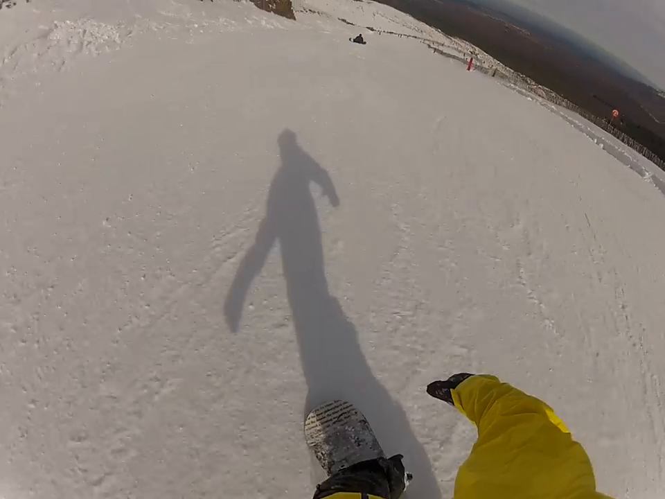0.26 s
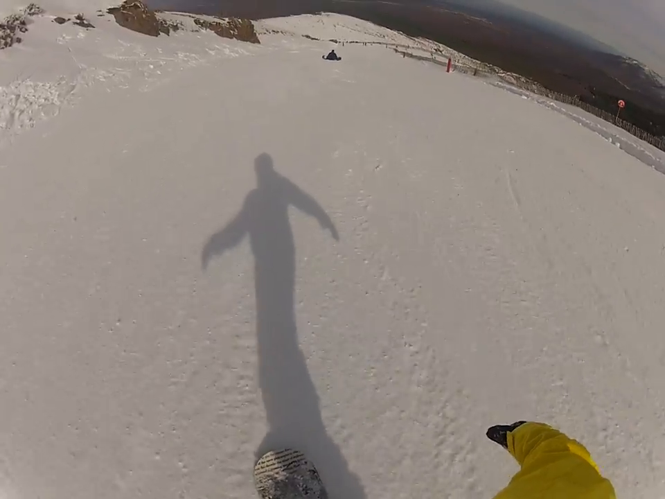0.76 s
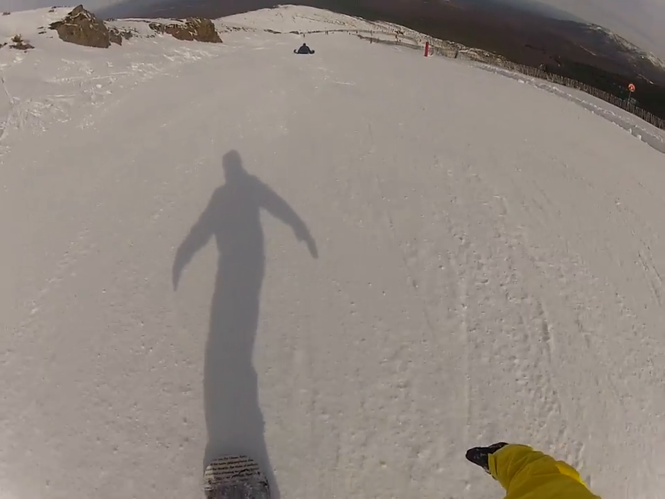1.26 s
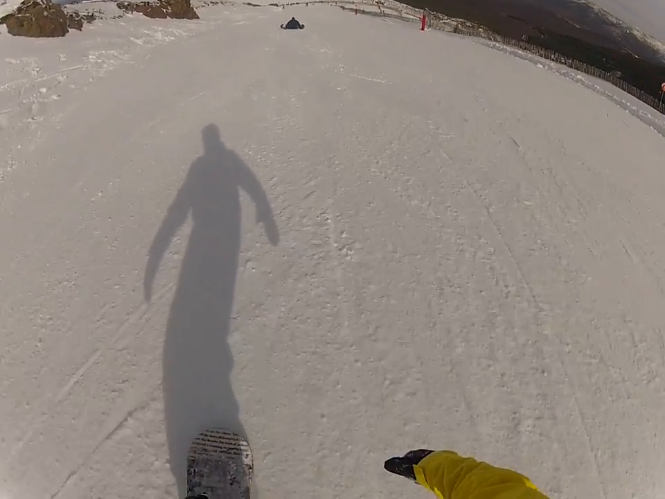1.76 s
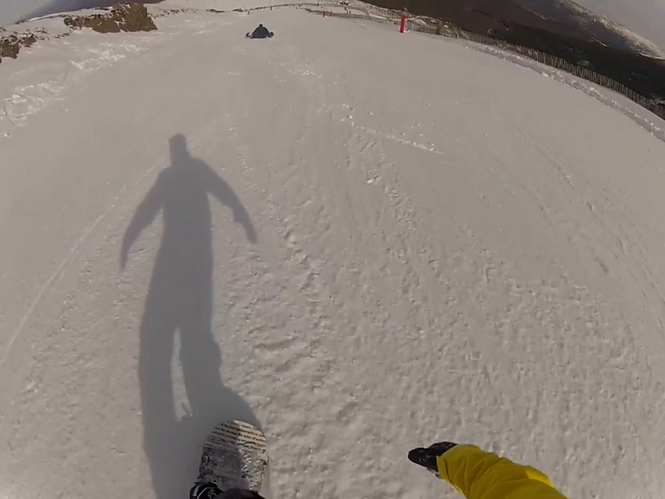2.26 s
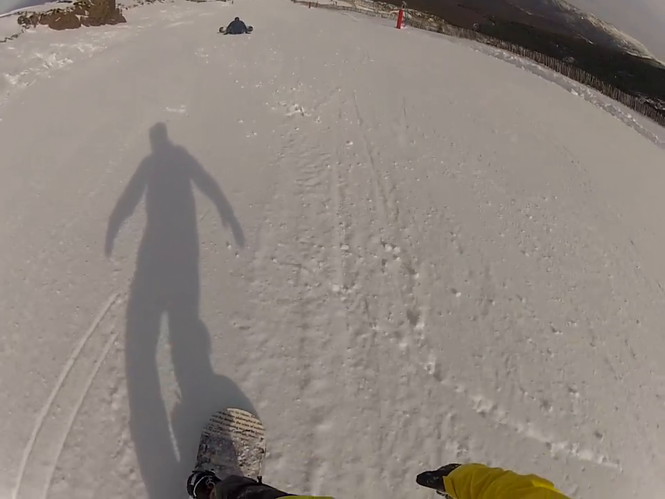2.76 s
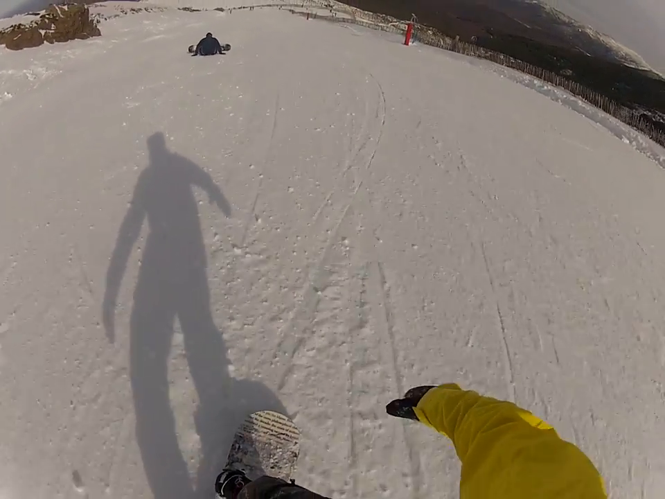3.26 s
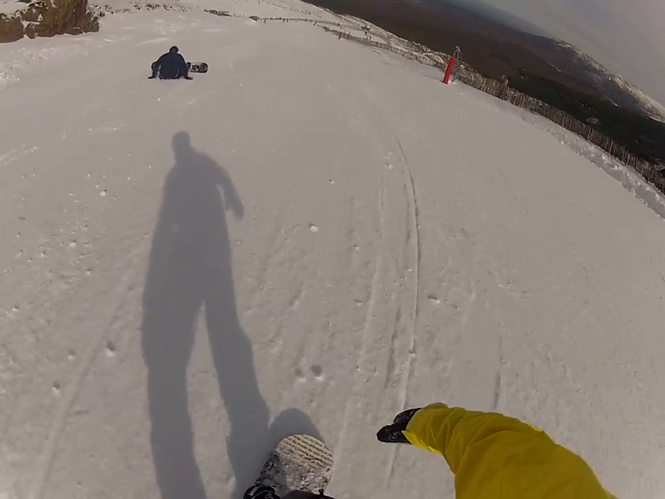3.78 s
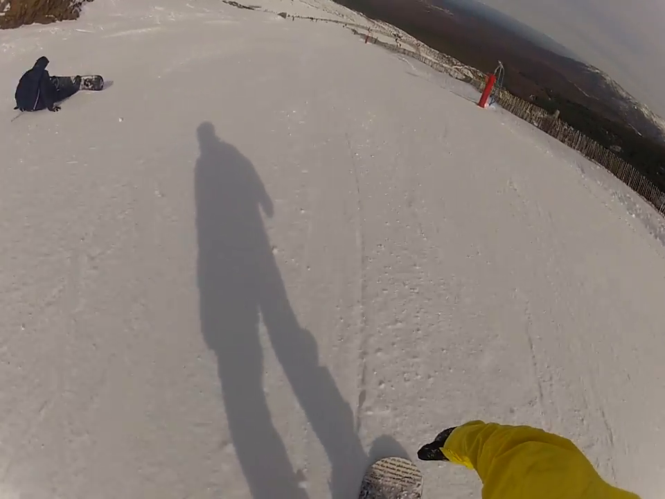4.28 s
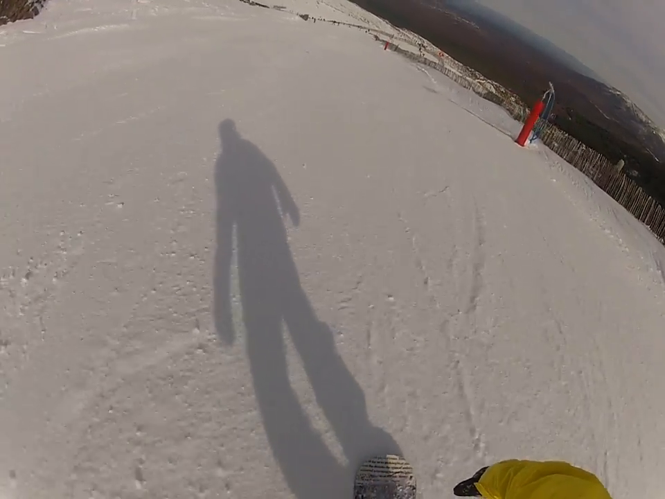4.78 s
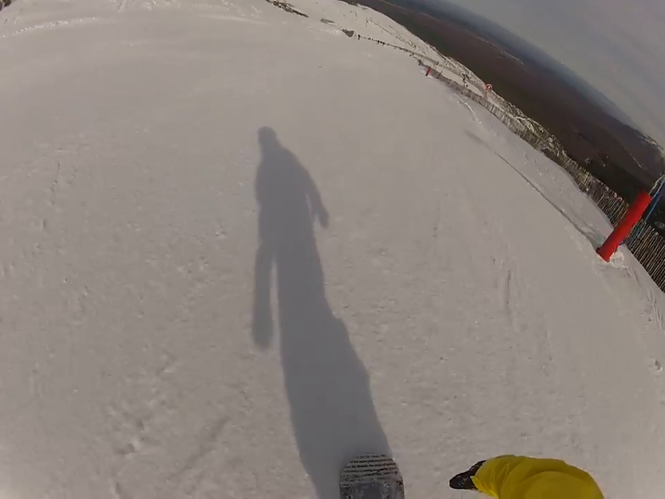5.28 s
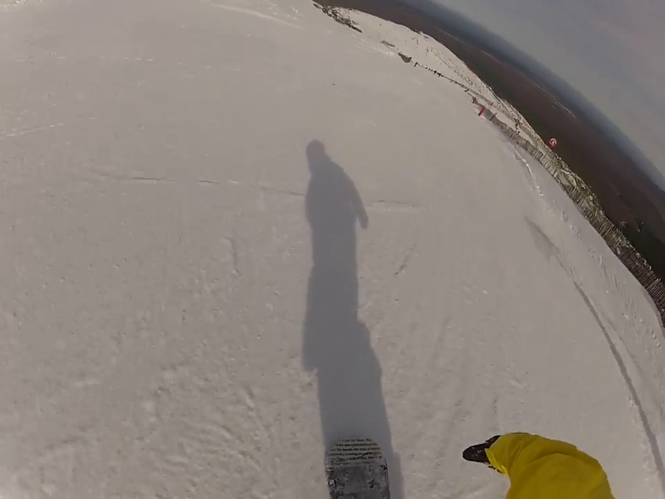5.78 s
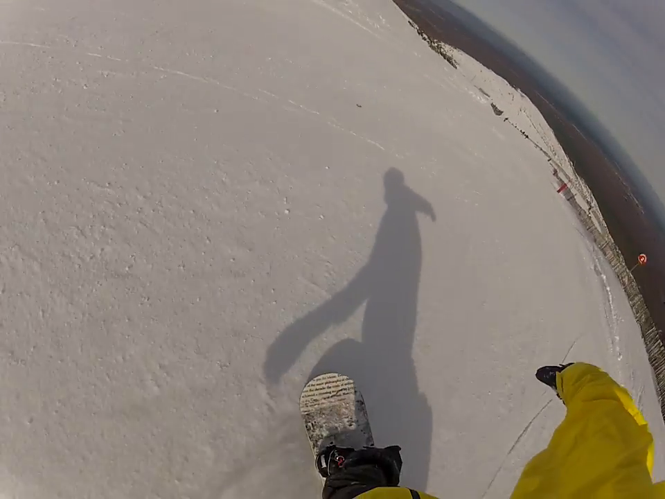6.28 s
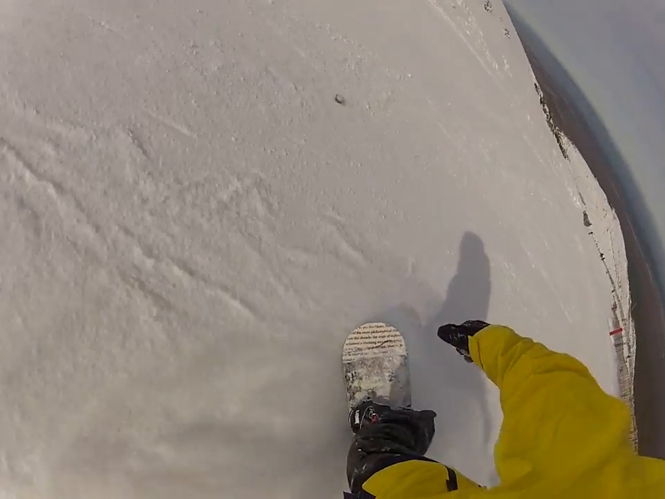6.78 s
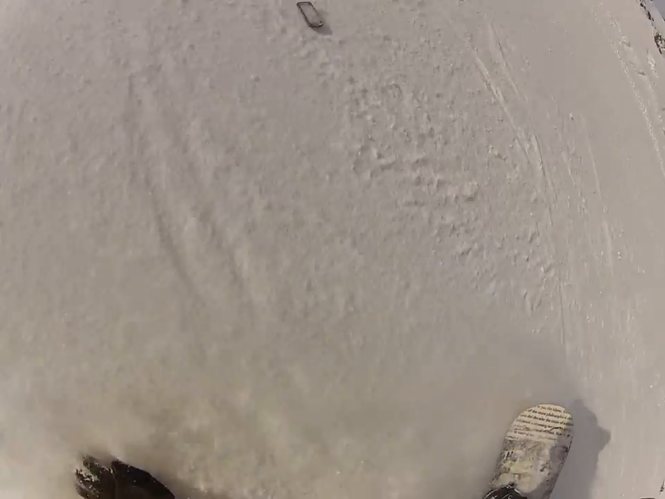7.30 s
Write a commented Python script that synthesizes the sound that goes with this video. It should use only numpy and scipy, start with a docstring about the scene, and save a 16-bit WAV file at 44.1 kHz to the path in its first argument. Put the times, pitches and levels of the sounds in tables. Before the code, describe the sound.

A snowboard hisses and crunches over packed snow with low rumble, dull bumps and buffeting wind, then scrapes harder into a skidding stop.

```python
"""A hiss and crunch of packed snow under a snowboard, with rumble, dull thuds and buffeting wind.
Friction is grainy noise ringing through the resonances of the board; ripples make low surging noise.
Bumps excite the damped modes of a camera mount, and gusts buffet the camera case worn by the rider.
At the end the rider leans on the heel edge and skids to a stop: scrape and spray grow, lumps crack."""
import sys
import numpy as np
from scipy import signal
from scipy.fft import rfft, irfft, next_fast_len
from scipy.io import wavfile
from scipy.ndimage import map_coordinates

SR = 44100
rng = np.random.default_rng(int(sys.argv[2]) if len(sys.argv) > 2 else 0)


def generate_wav(sig):
    """Save sig (samples, or channels by samples) to the path in sys.argv[1] as 16-bit PCM at SR."""
    pcm = np.round(np.clip(np.atleast_2d(sig).T, -1, 1) * 32767).astype(np.int16)
    wavfile.write(sys.argv[1], SR, pcm)


N = 332514

# hard bumps that knock the mount and load the board; stiffness 1 is firm, less is softer and lower:
# start_s, relative_level_db, stiffness
HARD_BUMPS = [(0.8209, -21.5, 1.01), (1.056, -25, 0.98), (1.154, -27.5, 1.05), (1.193, -27.5, 0.94),
              (1.237, -21.5, 0.52), (1.262, -18.5, 0.66), (1.306, -23.5, 0.51), (1.338, -25.5, .4),
              (1.434, -26, 1.03), (1.486, -20, 0.55), (1.517, -20, 1), (2.4067, -15.5, 0.95),
              (2.546, -21, 0.62), (2.59, -19.5, 0.9), (2.724, -19.5, 0.87), (2.969, -22, 1.16),
              (3.412, -25, 0.76), (3.9009, -17, 1.05), (4.114, -26.5, 0.84), (5.043, -24.5, 0.71),
              (5.2, -24.5, 0.77), (5.518, -19.5, 0.6), (5.68, -19.5, 0.61), (5.815, -12, 0.9),
              (6.3613, -12, 1.04), (7.2656, -15.5, 1), (7.289, -22, 0.89), (7.336, -21, 0.96),
              (7.358, -16.5, 0.82), (7.365, -18.5, 0.76), (7.411, -19.5, 0.98)]
# which edge bites, limited to -1 toe, 0 flat, 1 heel where it is read: time_s, edge
EDGE_TILT = [(0, 0.8), (.4, 0.36), (.8, 0.53), (1.2, -1.6), (1.5, -1.6), (2.8, -0.96), (3.4, -0.82),
             (3.75, -0.21), (4.05, -0.0056), (4.5, 0.13), (5, 0.08), (5.6, 0.17), (6.4, 0.22), (6.52, 0.89),
             (7.1, 0.72), (7.54, 1)]
# references for an easy glide: edge pressure and airflow, both as relative levels
CRUISE_DB, CRUISE_AIR_DB = -51.5, -38


def amp(db):
    """Logarithmic level: 20 dB is a tenfold gain in amplitude."""
    return 10 ** (np.asarray(db) / 20)


def unit(x):
    """Normalization: equal mean power, here an rms of 1."""
    return x / np.sqrt(np.mean(x ** 2) + 1e-20)


def along(points, hz):
    """Interpolation of (frequency, value) points on a logarithmic frequency axis."""
    f, v = np.transpose(points)
    return np.interp(np.log(hz + 1), np.log(f + 1), v)


def curves(rows):
    """Linear interpolation in time: one value per sample for each column after the time."""
    s, *cols = np.transpose(rows)
    return [np.interp(np.arange(N) / SR, s, c) for c in cols]


def wobble(rate):
    """Slow random modulation: a smooth curve through random knots, rate of them a second."""
    knots = rng.standard_normal(int(N * rate / SR) + 4)
    return map_coordinates(knots, [np.arange(N) * rate / SR])


def swell(middle, length):
    """Raised-cosine envelope: a smooth rise from 0 to 1 and back within the length."""
    phase = np.clip((np.arange(N) / SR - middle) / length, -.5, .5)
    return np.cos(np.pi * phase) ** 2


def filtered(x, response):
    """Linear filtering: the spectrum is multiplied by a response of frequency."""
    m = next_fast_len(len(x) + 8192)  # zero padding
    return irfft(rfft(x, m) * response(np.fft.rfftfreq(m, 1 / SR)), m)[:len(x)]


def noise(spectrum):
    """Spectral shaping: white noise takes on a given spectrum at rms 1."""
    return unit(filtered(rng.standard_normal(N), lambda hz: amp(along(spectrum, hz))))


def resonate(x, hz, q):
    """Damped resonance: a peak filter of quality factor q."""
    return signal.lfilter(*signal.iirpeak(hz, q, SR), x)


def add(track, s, sound):
    """Superposition: a sound is mixed into the track at time s."""
    part = track[round(s * SR):][:len(sound)]
    part += sound[:len(part)]


def wind(air_db):
    """Turbulence: airflow makes low noise at the camera case, modulated by gusts and small eddies."""
    # spectrum of the buffeting: frequency_hz, relative_level_db
    buffet_spectrum = [(10, -43), (25, 2), (45, 1), (68, 0), (90, -10.5), (130, -19), (250, -33),
                       (600, -31), (2000, -110)]
    # the strongest gusts: middle_s, extra_level_db
    strong_gusts = [(.83, 2), (1.27, 3.5), (1.72, 4), (2.08, 3.5), (2.19, 6.5), (2.43, 6.5), (3.46, 3),
                    (3.72, 4), (4.18, 4), (4.65, 9.5), (4.93, 5), (5.23, 2), (5.56, 7), (5.7, 7.5),
                    (5.83, 7), (6.35, 4), (7.38, 11)]
    gust_s, eddy_db, eddies_per_s = .14, 2.5, 12  # gust length; eddy depth per unit wobble; eddy pace
    gust_db = sum(db * swell(s, gust_s) for s, db in strong_gusts)
    rush = noise(buffet_spectrum)
    eddies = amp(eddy_db * np.clip(wobble(eddies_per_s), -2, 1))
    return amp(air_db + gust_db + 0.9) * unit(rush * eddies)


def board(pressure_db, air_db):
    """Forced vibration: ripples drive the board in irregular surges that grow with load and airflow."""
    # spectrum of the rumble: frequency_hz, relative_level_db
    rumble_spectrum = [(40, -14), (90, -5), (125, 0), (170, -2.5), (220, -3), (320, -5.5), (420, -25),
                       (700, -47), (3000, -79)]
    rumble_db = -44.5  # at an easy glide, on a flat board
    per_pressure_db, per_air_db = 0.72, 0.31  # dB per dB
    heel_quiet_db = 3.5  # tilted on its heel edge the board meets fewer ripples
    heel = np.clip(curves(EDGE_TILT)[0], 0, 1)
    load_db = per_pressure_db * (pressure_db - CRUISE_DB)
    speed_db = per_air_db * (air_db - CRUISE_AIR_DB)
    level_db = rumble_db + load_db + speed_db - heel_quiet_db * heel
    rumble = noise(rumble_spectrum)
    surges = amp(1.8 * wobble(45) + 2.3 * wobble(9))
    return amp(level_db) * unit(rumble * surges)


def jarring():
    """Transient loading: each hard bump loads the board quickly, then relaxes; overlaps saturate at 1."""
    peak_s = 0.013  # from impact to greatest load
    ages = (np.clip((np.arange(N) / SR - s) / peak_s, 0, 20) for s, db, stiffness in HARD_BUMPS)
    return np.tanh(sum(age * np.exp(1 - age) for age in ages))


def bumps(air_db):
    """Modal impact: a jolt makes the mount's damped modes thud; small random jolts follow the airflow."""
    # modes of the mount at stiffness 1: frequency_hz, relative_level_db, t60_s
    mount_modes = [(69, 2.5, 0.045), (166, 6, 0.032), (298, -24, 0.0078)]
    jolts_per_s, jolt_db, jolt_spread_db = 3, 2.5, 1  # rate; mean level over the airflow; scatter
    track, t = np.zeros(N), np.arange(SR // 8) / SR
    jolts = []
    for i in np.flatnonzero(rng.random(N) < jolts_per_s / SR):
        level_db = air_db[i] + jolt_db + jolt_spread_db * rng.uniform(-1, 1)
        jolts.append((i / SR, level_db, rng.uniform(0.56, 1.05)))
    for s, db, stiffness in HARD_BUMPS + jolts:
        age = t * stiffness  # a soft bump swings more slowly and for longer
        thud = np.zeros(len(t))
        for k, (hz, level, t60) in enumerate(mount_modes):
            sign = (-1) ** (k + 1)  # neighbouring modes start in opposite phase
            thud += sign * amp(level - 60 * age / t60) * np.sin(2 * np.pi * hz * age)
        thud = thud * (1 - np.exp(-t / 0.003))  # soft onset
        add(track, s, amp(db - 1.0) * thud / np.abs(thud).max())
    return track


def lumps():
    """Impact noise: lumps of snow and ice burst through two broad resonances, dull if soft, bright if icy."""
    # lumps under the board: start_s, relative_level_db, pitch_hz, burst_t60_s
    snow_lumps = [(.822, -36, 1100, .016), (3.327, -37, 1200, 0.051), (3.338, -39, 3300, 0.035),
                  (3.533, -32.5, 890, 0.034), (3.901, -30, 1100, 0.018), (3.921, -35.5, 2300, 0.028),
                  (5.428, -26, 1680, 0.035), (5.513, -30, 1630, .03), (7.127, -19.5, 1310, 0.027),
                  (7.265, -11.5, 970, 0.02), (7.267, -18, 1890, 0.011), (7.331, -17.5, 1170, 0.037),
                  (7.389, -33, 700, .018), (7.422, -16.5, 4430, 0.013)]
    track, t = np.zeros(N), np.arange(SR // 20) / SR
    for s, db, hz, t60 in snow_lumps:
        burst = rng.standard_normal(len(t)) * amp(-60 * t / t60)
        ring = resonate(burst, hz, q=1.6) - amp(-5) * resonate(burst, 2.13 * hz, q=3.8)
        softened = signal.lfilter(*signal.butter(1, 0.99 * hz, fs=SR), ring)
        crack = softened + amp(-27) * burst  # the faint broadband part is the crunch of crumbs
        crack = crack - resonate(crack, 5950, q=1.7)  # a dip near 6 kHz leaves the crack hollow
        add(track, s, amp(db - 3.0) * crack / np.abs(crack).max())
    return track


def bites():
    """Narrow-band filtering: noise around one resonance swells for a moment and flutters."""
    # swells of narrow noise: start_s, end_s, pitch_hz, relative_level_db
    narrow_swells = [(0, .2, 2500, -58), (.15, 0.282, 343, -46), (0.602, 0.775, 256, -53.5),
                     (1.469, 1.78, 1830, -56), (2.74, 2.92, 1800, -60), (2.948, 3.65, 660, -56),
                     (3.921, 4.522, 1200, -56), (6.199, 6.37, 1820, -45), (6.44, 6.71, 4800, -56)]
    flutter_db = 2.5  # per unit wobble
    track = np.zeros(N)
    for start, end, hz, db in narrow_swells:
        length = round((end - start) * SR)
        band = resonate(resonate(rng.standard_normal(length), hz, q=5.5), hz, q=5.5)
        add(track, start, amp(db - 2.5) * unit(band) * signal.windows.tukey(length, .6))
    return track * amp(flutter_db * wobble(40))


def body(edge, size=2048):
    """Minimum-phase transmission: causal impulse response from snow through board and case, edge -1 to 1."""
    # broad slope of the friction noise: frequency_hz, relative_level_db
    friction_slope = [(60, -9.5), (200, 3.5), (310, 12), (450, 6.5), (850, 1.6), (2000, -4.5), (4000, -17),
                      (8000, -22.5), (11500, -24), (15000, -25.5)]
    # Gaussian peaks of board and case: centre_hz, sigma_hz, toe_edge_db, flat_db, heel_edge_db
    body_peaks = [(545, 32, -10.5, -4.5, 4.5), (680, 21, 7, 3.5, 4.5), (976, 33, 5, 4.5, 3.5),
                  (1231, 125, 5.5, 8, 7), (1713, 87, 11.5, 10.5, 5), (1924, 105, 8.5, 7.5, 8),
                  (2490, 195, 6.5, 6.5, 15.5), (3093, 103, 1.5, 3.5, 10.5), (3583, 216, 10, 5.5, 11),
                  (4774, 355, 9.5, 4.5, 12), (5985, 170, -7, -12.5, -4.5), (7220, 310, 9, 4, 12),
                  (8500, 270, 9, 5, 11.5), (9550, 310, 7.5, 8.5, 16.5), (10240, 177, 16, 14.5, 9.5),
                  (10850, 131, 9, 12, 11), (13400, 124, 15, 8, 11), (13800, 210, 10, 13.5, 8),
                  (14540, 174, 9, 10, 17)]
    hz = np.fft.rfftfreq(size, 1 / SR)
    db = along(friction_slope, hz)
    for centre, width, *heights in body_peaks:
        height = np.interp(edge, [-1, 0, 1], heights)
        db = db + height * np.exp(-.5 * ((hz - centre) / width) ** 2)
    # folding the cepstrum onto positive times gives the minimum phase
    cepstrum = irfft(np.log(amp(db)))
    fold = np.r_[1, np.full(size // 2 - 1, 2), np.zeros(size // 2)]
    response = irfft(np.exp(rfft(cepstrum * fold)))
    return response / np.linalg.norm(response)


def through_board(force):
    """Convolution: friction rings the board, coloured anew as the rider rolls from edge to edge."""
    edge = np.clip(curves(EDGE_TILT)[0], -1, 1)
    total = np.zeros(N)
    for state in (-1, 0, 1):
        share = np.maximum(0, 1 - np.abs(edge - state))
        total += share * signal.fftconvolve(force, body(state))[:N]
    return total


def crunch(rate, spread_db, grain_db):
    """Random impulses: snow crystals break in single snaps of uneven size over a dense hiss."""
    struck = rng.random(N) < rate / SR
    signs = rng.choice([-1, 1], N)
    sizes = amp(spread_db * np.minimum(rng.exponential(size=N), 4))  # size is capped
    return unit(rng.standard_normal(N) + amp(grain_db) * unit(struck * signs * sizes))


def sliding(pressure_db):
    """Granular friction: the edge crushes coarse grains in a low scrape and sheds fine, bright spray."""
    spray_db, spray_grows = -59.5, 1  # spray level at an easy glide; dB per dB of pressure
    glide_hiss_db = -67  # the base hisses even with no load on the edge
    loaded_spray = amp(spray_db + spray_grows * (pressure_db - CRUISE_DB))
    spray = np.hypot(loaded_spray, amp(glide_hiss_db))
    # uneven snow makes the edge grip and let go; each kind of grain also chatters on its own
    grip_db = 1.14 * wobble(25) + 0.81 * wobble(90)
    coarse = crunch(rate=500, spread_db=3.5, grain_db=-6.0)
    coarse = coarse * amp(grip_db + 0.7 * wobble(250))
    fine = crunch(rate=1200, spread_db=3.0, grain_db=-5.0)
    fine = fine * amp(grip_db + 0.74 * wobble(70) + 0.64 * wobble(350))

    def treble_share(hz):
        """Power-complementary crossover: half the power passes near 3600 Hz."""
        return 1 / (1 + (3600 / (hz + 1)) ** 4)

    low = filtered(through_board(coarse), lambda hz: np.sqrt(1 - treble_share(hz)))
    high = filtered(through_board(fine), lambda hz: np.sqrt(treble_share(hz)))
    return amp(pressure_db + 2.0) * unit(low) + spray * unit(high)


def scene():
    """Superposition: snow, board, mount and wind sum at one microphone; most follow pressure or airflow."""
    # how hard the edge presses; drives scrape, spray and rumble: time_s, relative_level_db
    edge_pressure = [(0, -49.5), (.27, -51.5), (.48, -63), (1.0, -61.5), (1.35, -62.5), (1.62, -55),
                     (1.88, -59.5), (2.25, -56.5), (2.5, -52), (3.15, -54.5), (4.35, -52.5), (4.55, -56),
                     (5.0, -51), (5.65, -45.5), (6.3, -44), (6.8, -44), (7.15, -42.5), (7.37, -39)]
    # brief pushes that dig the edge in: middle_s, length_s, extra_pressure_db
    edge_digs = [(0.214, .12, 1.5), (0.84, 0.07, 4), (1.254, 0.065, 9.5), (1.417, 0.097, 8.5),
                 (2.83, 0.096, 1.5), (3.32, 0.12, 3.5), (3.526, 0.12, 4), (5.035, 0.11, 5),
                 (5.505, 0.082, 5.5), (5.79, .12, 1.5), (6.308, 0.19, 3), (6.521, 0.092, 4)]
    # air streaming past the rider; drives buffeting, rumble and small jolts: time_s, relative_level_db
    air_stream = [(0, -44), (.35, -45), (.5, -52), (.95, -48.5), (1.3, -37.5), (1.8, -41.5), (2.5, -36),
                  (3.5, -37.5), (4.3, -41), (4.8, -43.5), (5.05, -35), (5.8, -34), (6.65, -35.5),
                  (7.54, -40.5)]
    load_db, shudder_db = 0.5, 3.5  # extra pressure and extra rumble at a jarring load of 1
    dig_db = sum(db * swell(s, length) for s, length, db in edge_digs)
    pressure_db = curves(edge_pressure)[0] + dig_db
    air_db, = curves(air_stream)
    load = jarring()
    snow = sliding(pressure_db + load_db * load) + bites() + lumps()
    shaking = board(pressure_db, air_db) * amp(shudder_db * load) + bumps(air_db)
    return (snow + shaking + wind(air_db))[None]


def record(dry):
    """Amplitude modulation: bass shifted around 12 kHz is a faint fizz; a sharp band limit follows."""
    top_hz = 15330
    sound = dry[0]
    carrier = np.cos(2 * np.pi * 12000 * np.arange(N) / SR)
    # weighting of the bass: frequency_hz, gain_db
    bass_weight = [(30, -17), (170, -2.0), (350, 6), (900, -20), (3000, -58)]
    bass = filtered(sound, lambda hz: amp(along(bass_weight, hz)))
    return filtered(sound + amp(-28.5) * bass * carrier, lambda hz: hz < top_hz)[None]


dry = scene()
out = record(dry)
generate_wav(out)
```